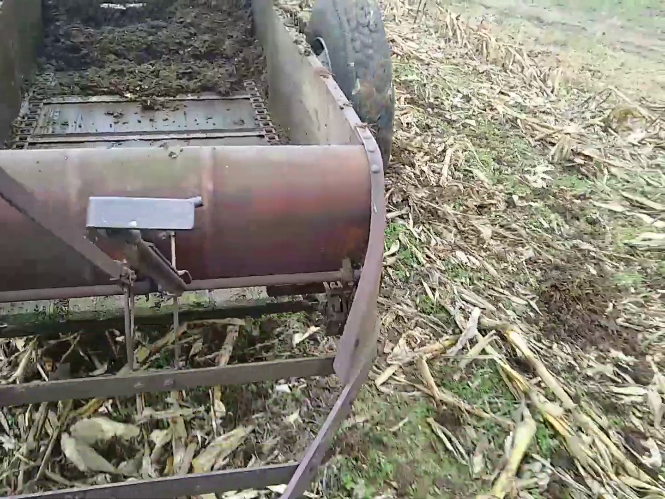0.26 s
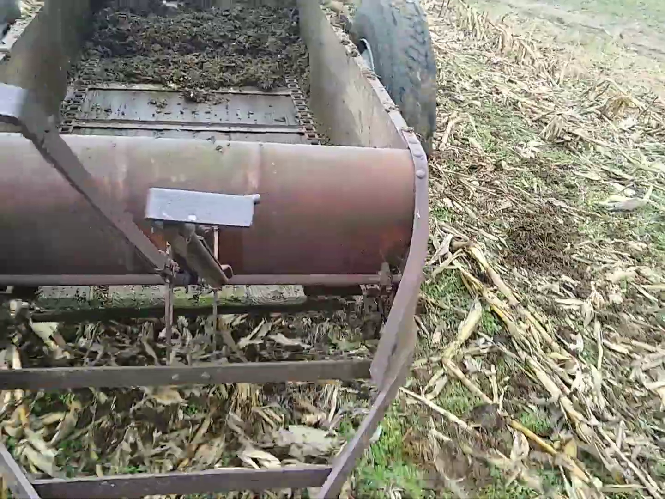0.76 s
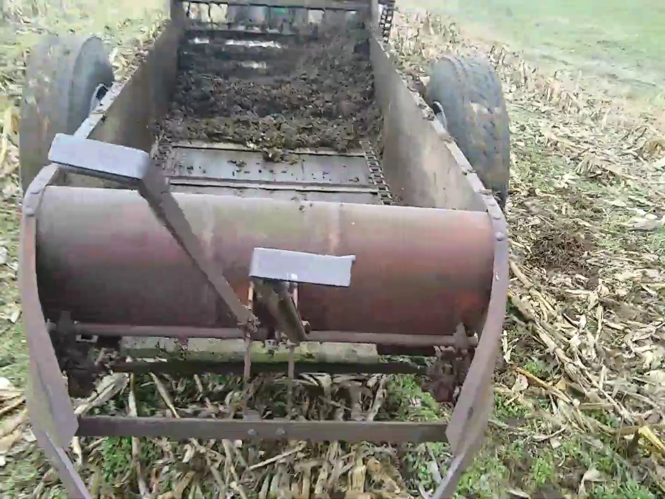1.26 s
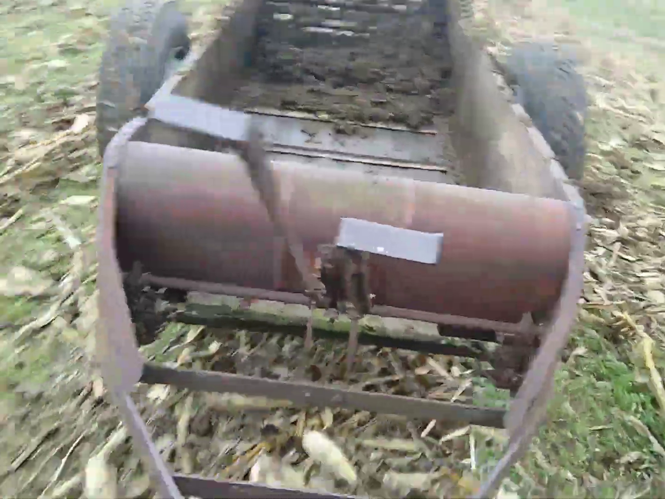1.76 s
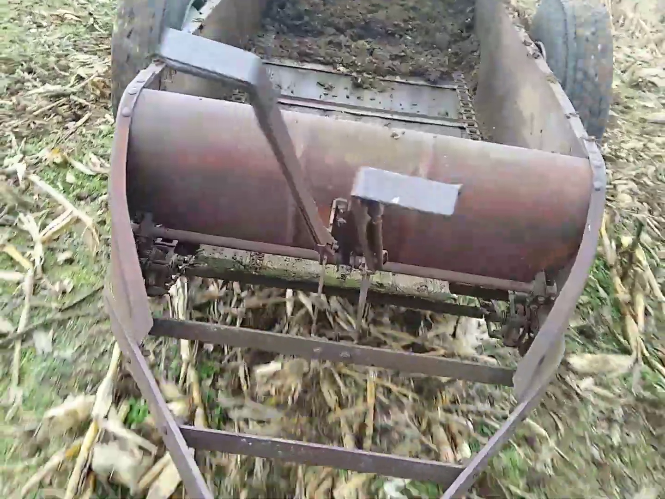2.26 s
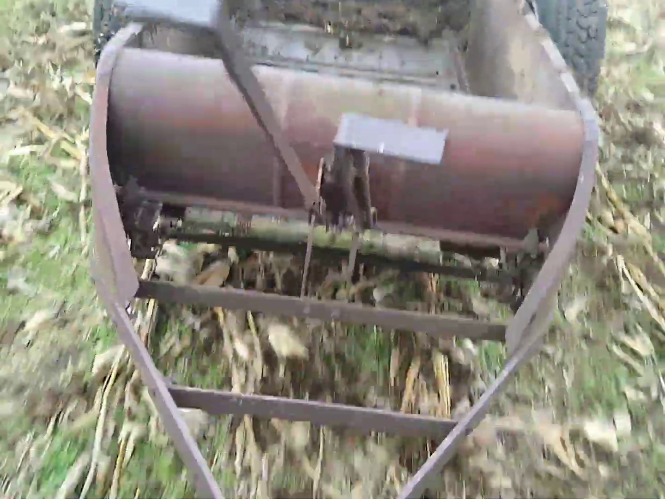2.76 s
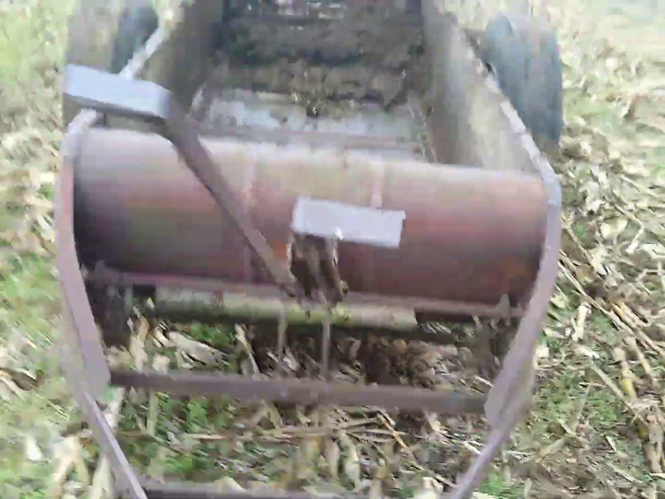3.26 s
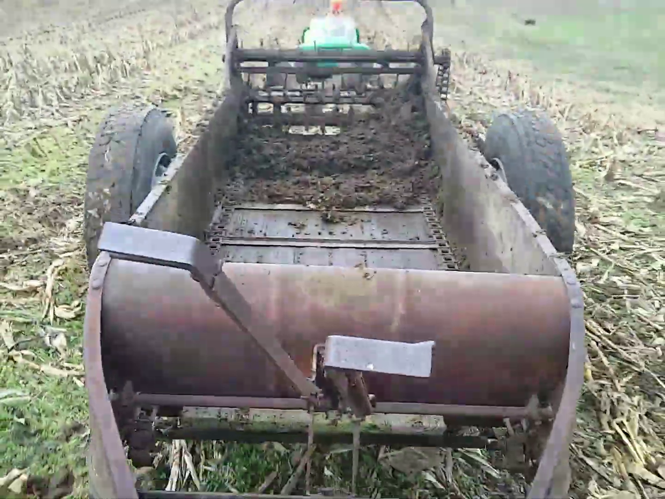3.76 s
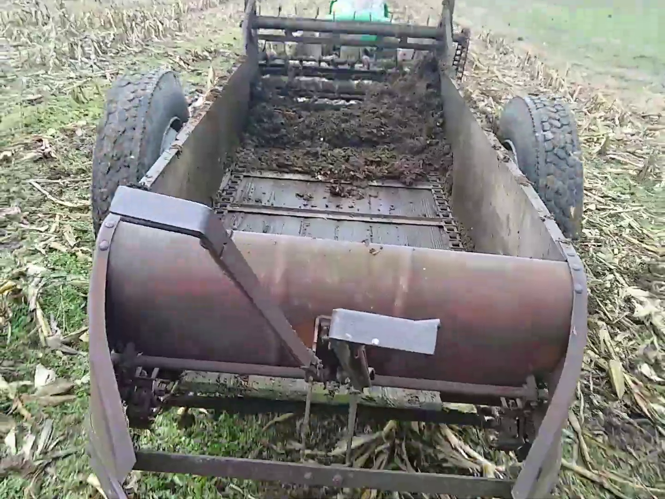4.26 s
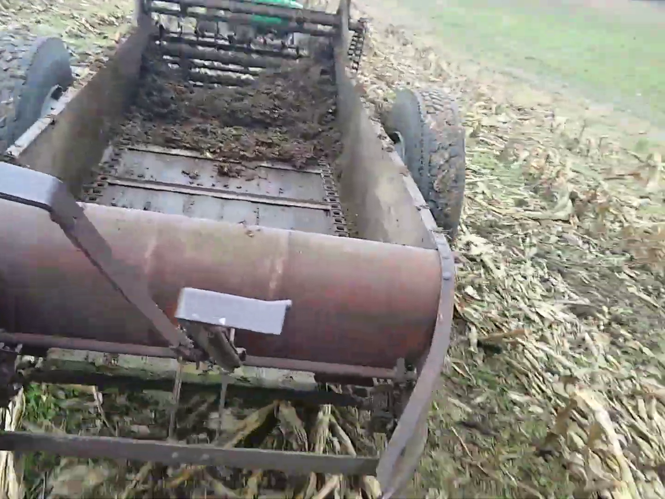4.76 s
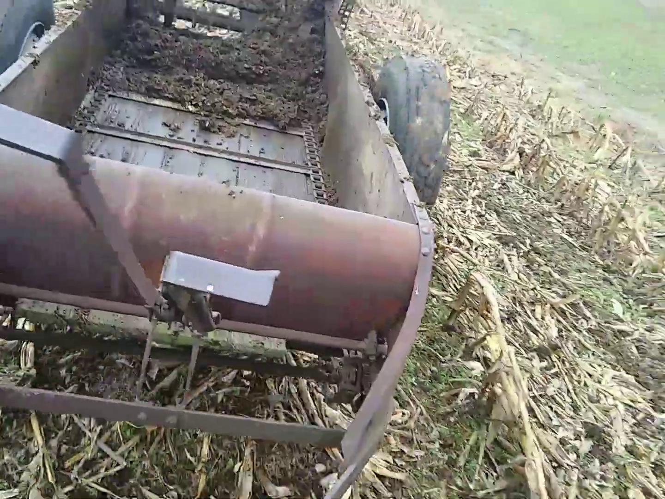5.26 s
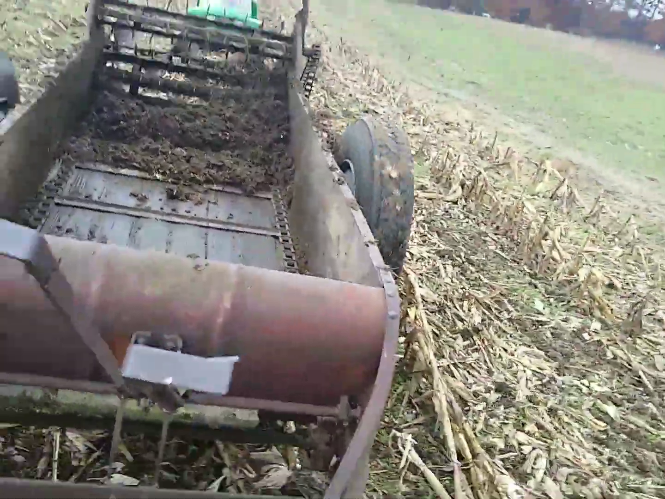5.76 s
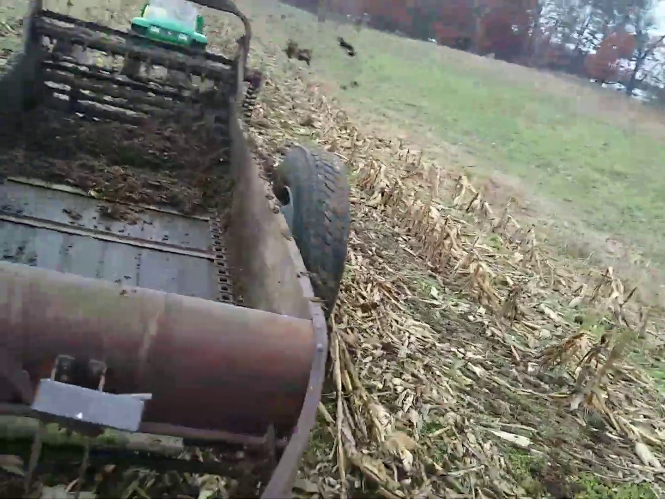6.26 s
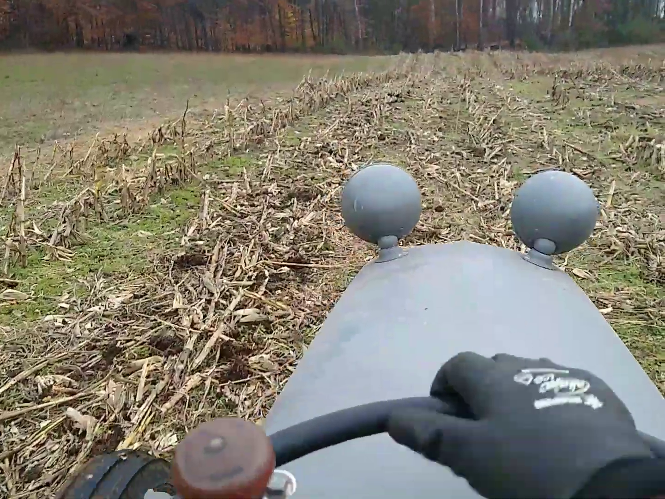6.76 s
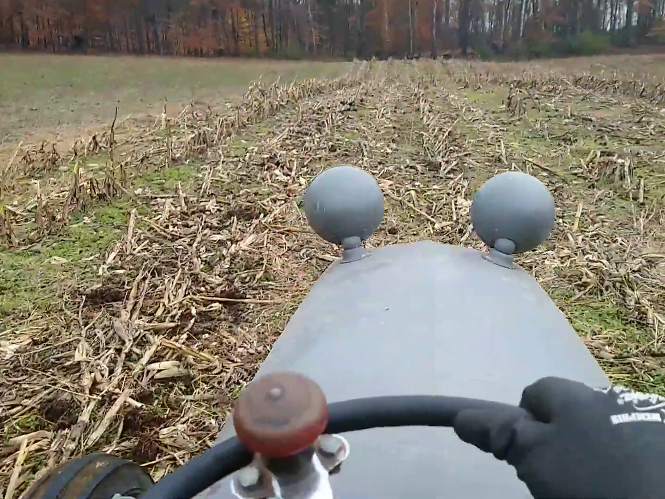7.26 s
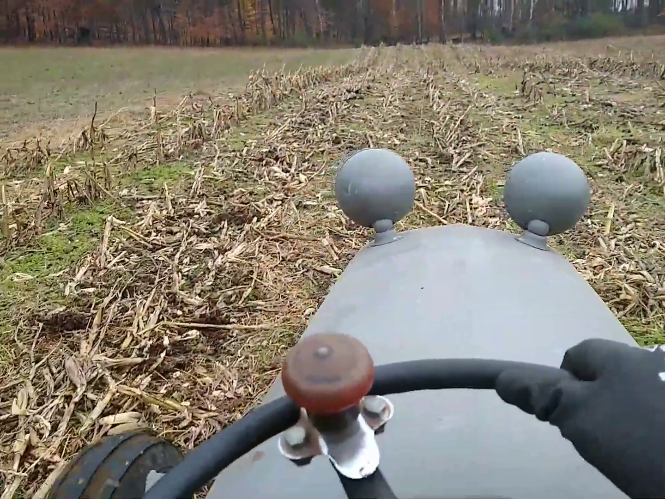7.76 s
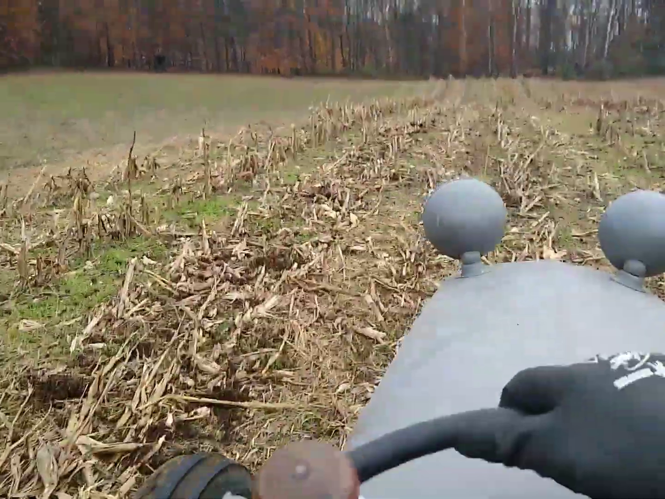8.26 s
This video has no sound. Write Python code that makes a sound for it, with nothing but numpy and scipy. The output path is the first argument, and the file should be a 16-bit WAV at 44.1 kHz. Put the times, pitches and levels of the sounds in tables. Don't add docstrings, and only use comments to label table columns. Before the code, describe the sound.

A small tractor engine growls steadily with pulsing bright hiss, metal chain ticks and wind thumps, cuts out for an instant, then returns much louder.

```python
import sys
import numpy as np
from scipy import signal
from scipy.fft import rfft, irfft, next_fast_len
from scipy.io import wavfile

SR = 44100
rng = np.random.default_rng(int(sys.argv[2]) if len(sys.argv) > 2 else 0)


def pcm_store(signal):
    levels = np.round(np.clip(np.atleast_2d(signal), -1, 1) * 32767)
    wavfile.write(sys.argv[1], SR, levels.astype(np.int16).T)


def gain_from_db(level_db):
    decades = np.asarray(level_db, float) / 20
    return 10 ** decades


N = 374850
FACING_BACK = np.arange(N) < 6.5 * SR

# (facing back [Hz, then dB], facing forward [Hz, then dB])
ENGINE_PACE = [(119, 112), (-35, -24)]
# (frequency [Hz], likeness [0 to 1])
LIKENESS = [(60, 0.88), (150, 0.98), (300, 0.86), (450, 0.53), (650, 0.39), (900, 0.035), (1500, 0.016),
            (3000, 0.049), (15000, .02)]


def by_side(back, forward):
    return np.where(FACING_BACK, back, forward)


def at_hz(points, hz):
    known_hz, values = np.array(points).T
    return np.interp(np.log(hz), np.log(known_hz), values)


def rms_one(x):
    return x / np.sqrt(np.mean(x ** 2) + 1e-20)


def drift(rate):
    r = np.exp(-80 * np.pi * rate / SR)
    slow = signal.lfilter([1], [1, -2 * r, r * r], rng.standard_normal(N // 40 + 2002))[2000:]
    return np.interp(np.arange(N) / 40, np.arange(len(slow)), rms_one(slow))


def resonance(x, hz, width):
    r = np.exp(-np.pi * width / SR)
    top = np.array([1, 0, -1]) * (1 - r * r) / 2
    return signal.lfilter(top, [1, -2 * r * np.cos(2 * np.pi * hz / SR), r * r], x)


def ports(lead_db):
    return gain_from_db(lead_db / 2 * np.array([[1], [-1]]))


def two_ports(common, own, alike):
    return np.sqrt(1 + alike) * common + np.sqrt(1 - alike) * own * [[1], [-1]]


def dips(events, fall, recover):
    t = np.arange(0, N + 40, 40) / SR
    out = 0
    for s, depth_db in events:
        shape = np.minimum(1 + (t - s) / fall, 1 - (t - s) / recover)
        out = out - depth_db * np.clip(shape, 0, 1)
    return np.interp(np.arange(N) / SR, t, out)


def tones(firing, level_db):
    # (multiple of the firing rate [1], level facing back [dB], facing forward [dB])
    exhaust = [(1, -10.5, -22.5), (2, 2, 2), (2.498, -15, -35), (3, -9, -3), (3.252, -19.5, -9.5),
               (4, -9.5, -9)]
    # (left excess back [dB], right lag back [rad],
    # left excess forward [dB], right lag forward [rad])
    tone_ports = [(5.2, .08, 2.4, 0), (2.7, .07, 2.7, .07), (3, 0, 3, 0), (4.7, .9, 3.6, -.2),
                  (3, 0, 3.6, -.2), (1, 0, 1, 0)]
    out = 0
    for (order, back_db, forward_db), (lead_db, lag, front_lead_db, front_lag) in zip(exhaust, tone_ports):
        waver_db = drift(0.8) * abs(order - 2) + 0.5 * drift(6.3)
        port_lag = by_side(lag, front_lag) * [[0], [1]]
        line = np.sin(2 * np.pi * (order * firing + rng.random()) - port_lag)
        gain = by_side(ports(lead_db), ports(front_lead_db))
        out = out + gain * gain_from_db(level_db + 11.5 + by_side(back_db, forward_db) + waver_db) * line
    return out


def knocks(firing, roar_db):
    cylinder_db = [-1.5, -26, -19.5, -12]
    # (frequency [Hz], width [Hz], level [dB])
    block = [(262, 180, -9), (452, 77, 7), (504, 35, 19.5), (523, 140, -4), (731, 180, 2.5),
             (980, 270, -18), (1445, 160, -23.5)]
    at = np.flatnonzero(np.diff(np.floor(firing)))
    pulses = np.full(N, 1e-18)
    pulses[at] = gain_from_db(np.resize(cylinder_db, len(at)) + 3.8 * rng.standard_normal(len(at)))
    rung = 0
    for k, (hz, width, db) in enumerate(block):
        rung = rung + (-1) ** k * gain_from_db(db) * resonance(pulses, hz, width)
    return ports(2.5) * gain_from_db(roar_db - 21.5) * rms_one(rung)


def pops(firing, roar_db):
    at = np.flatnonzero(np.diff(np.floor(firing / 2 + 0.58)))
    pulses = np.full(N, 1e-18)
    pulses[at] = gain_from_db(3 * rng.standard_normal(len(at)))
    shape = signal.butter(1, (150, 850), "band", fs=SR, output="sos")
    puff = signal.sosfilt(np.vstack([shape, shape]), pulses)
    usual_peak = np.median(puff[at + 8])
    return ports(2.0) * gain_from_db(roar_db + by_side(7.5, 2)) * puff / usual_peak


def gear_lines(firing, roar_db, whine_db):
    # (multiple of the firing rate [1], level re roar back [dB], forward [dB],
    # share of the whine control [1], right lag [rad])
    lines = [(4.5, -14, -32, 0, .3), (5, -24, -20, 0, 1.6), (6.25, -19, -32, 0, 1.6), (7, -17, -19, 0, .6),
             (7.25, -16, -32, 0, 0), (7.75, -12.5, -32, 0, 0), (8.25, -32, -22, 0, 0),
             (9.5, -9, -32, 1.4, 0), (10, -32, -24, 0, 0), (11, -12, -32, 1.4, 0), (14, -32, -28, 0, 0)]
    whine_db = np.minimum(whine_db, by_side(3, -6))
    out = 0
    for order, back_db, forward_db, share, lag in lines:
        phase = 2 * np.pi * order * firing + 0.45 * drift(2.5)
        level_db = by_side(back_db, forward_db) + share * whine_db + 1.8 * drift(2.5)
        out = out + gain_from_db(level_db) * np.sin(phase - lag * np.array([[0], [1]]))
    return by_side(ports(4), ports(1.5)) * gain_from_db(roar_db + 7) * out


def swing(level_db):
    return level_db - by_side(level_db[:N // 2].mean(), level_db[-N // 5:].mean())


def roar(firing, roar_db, clatter_db, rattle_db):
    # (frequency [Hz], level per Hz [dB])
    rear = [(40, -58.5), (62, -50.5), (90, -48), (250, -45.5), (450, -49.5), (700, -54.5), (1050, -60),
            (1500, -63), (2200, -67.5), (3500, -69), (6000, -76.5), (8500, -89.5), (12500, -53),
            (15000, -77.2)]
    # (frequency [Hz], level per Hz [dB])
    front = [(40, -56), (62, -39), (90, -43.5), (250, -34.5), (450, -47.5), (700, -44.5), (1050, -50),
             (1500, -56.5), (2200, -63), (3500, -65), (6000, -75), (8500, -88.5), (12500, -46),
             (15000, -79.9)]
    # (frequency [Hz], excess [dB])
    left_lead = [(60, 3), (250, 1.5), (450, 2), (900, .8), (2500, 1.2), (4000, .3), (6000, 1.3), (9000, .3),
                 (15000, -.3)]
    # (frequency [Hz], excess [dB])
    left_lead_front = [(60, 3), (250, 1.5), (450, .3), (900, 1.8), (2500, 3), (6000, 2.8), (15000, 1.5)]
    out, together = 0, drift(18)
    band_edges = 40 * 2 ** np.arange(0, 8.1, 0.5)
    white = rng.standard_normal((2, 2, N))
    throb = np.cos(2 * np.pi * firing) + 1.4 * np.cos(np.pi * firing + 1.3)
    throb = throb + 0.2 * np.cos(4 * np.pi * firing + 0.52)
    clatter_db, rattle_db = swing(clatter_db), swing(rattle_db)
    for k, (low, high) in enumerate(zip(band_edges, band_edges[1:])):
        band = signal.butter(2, [low, high], "band", fs=SR, output="sos")
        common, own = signal.sosfilt(band, white[k % 2])
        hz = np.sqrt(low * high)
        alike = np.clip(at_hz(LIKENESS, hz), 0, 1)
        near = min(alike + 0.3 * (hz > 1800), 1)
        tilt_db = at_hz([(1500, 0), (3200, 1), (6500, 0)], hz) * clatter_db
        tilt_db = tilt_db + at_hz([(1500, 0), (3200, 0), (6500, 1)], hz) * rattle_db
        colour_db = by_side(at_hz(rear, hz) + 51, at_hz(front, hz) + 41)
        flicker_db = 0.4 * together + (0.89 + hz / 5500) * drift(26.0)
        gain = gain_from_db(colour_db + tilt_db + flicker_db + 0.57 * throb)
        sides = by_side(ports(at_hz(left_lead, hz)), ports(at_hz(left_lead_front, hz)))
        noise = by_side(two_ports(common, own, alike), two_ports(common, own, near))
        out = out + sides * gain * noise
    return gain_from_db(roar_db + 13.5) * (out + panels())


def panels():
    # (frequency [Hz], width [Hz], level back [dB], level forward [dB])
    sheets = [(258.7, 43, 0, -4.5), (436, 120, -9, -5.5), (957, 93, -16.5, -7), (1016, 75, -29, -8.5),
              (1473, 90, -18.5, -13.5), (2185, 470, -12.5, -18.5), (2655, 78, -13, -17.5),
              (2881, 188, -17, -20)]
    white = rng.standard_normal((2, N))
    out = 0
    for hz, width, back_db, forward_db in sheets:
        alike = np.clip(at_hz(LIKENESS, hz), 0, 1)
        width = max(width, hz / 15)
        common, own = resonance(resonance(white, hz, width), hz, width)
        level_db = by_side(back_db, forward_db) + 5.5 + 1.98 * drift(6.7)
        out = out + gain_from_db(level_db) * two_ports(common, own, alike)
    return out


def valve_hiss(firing, pulsing_db, level_db, left_db):
    # (frequency [Hz], width [Hz], level [dB])
    whistles = [(12300, 500, -5), (13300, 250, 2), (13680, 200, 5), (14020, 200, 5), (14680, 260, 3)]
    white = rng.standard_normal((2, N))
    band = signal.butter(2, [9800, 17000], "band", fs=SR, output="sos")
    air = signal.sosfilt(band, white)
    for hz, width, db in whistles:
        air = air + gain_from_db(db + by_side(1, -15) + 1.9 * drift(0.88)) * resonance(white, hz, width)
    turn = 2 * np.pi * firing + 0.3 * drift(12)
    puffs = np.cos(turn) + 0.85 * np.cos(2 * turn + 0.6) + 0.4 * np.cos(3 * turn + 1.1)
    puffing_db = level_db + 5.5 + pulsing_db * puffs + 1.95 * drift(39)
    return gain_from_db(puffing_db) * ports(left_db) * rms_one(air)


def chain():
    # (time [s], peak level [dB])
    loud_ticks = [(1.4197, -44), (1.8143, -38), (1.9909, -36), (2.1415, -36), (2.2443, -34), (2.2862, -43),
                  (2.3436, -28.5), (2.5451, -32), (2.6449, -50), (2.7442, -34), (2.812, -32), (3.014, -33),
                  (3.2326, -35), (3.6301, -34), (3.8871, -37), (3.9035, -31), (4.0053, -35), (4.0552, -35),
                  (4.1555, -41.5), (4.1884, -38), (4.2722, -50), (4.4094, -41), (4.4403, -30),
                  (4.5251, -39), (4.7466, -32), (5.0814, -39), (5.7548, -33), (6.0082, -39), (6.103, -42),
                  (6.1434, -38)]
    out, t = np.zeros((2, N)), np.arange(SR // 20) / SR
    ticks = list(loud_ticks) + faint_ticks()
    chances = rng.standard_normal((len(ticks), 3))
    for (s, db), (pan_db, grit, detune) in zip(ticks, chances):
        at = round(s * SR)
        link_hz = 5160 + 120 * detune
        ring = np.sin(2 * np.pi * link_hz * t) * gain_from_db(-60 * t / 0.026)
        click = rng.standard_normal((2, len(t))) * gain_from_db(-60 * t / 0.012 - 9 + 3 * grit)
        snap = ring + np.diff(click, prepend=0)
        out[:, at:at + len(t)] += gain_from_db(db - 1.2) * ports(3 * pan_db) * snap
    return out


def faint_ticks():
    turns_per_s = ENGINE_PACE[0][0] / 4
    s = (np.arange(190) + 0.8) / turns_per_s
    luck, spread = rng.random((190, 2)).T
    return [(at, -44 - 6 * r) for at, p, r in zip(s, luck, spread) if p < 0.3]


def wind():
    # (time [s], level [dB])
    bumps = [
        (.27, -28),
        (1.19, -21),
        (1.31, -34),
        (1.39, -22),
        (1.93, -21),
        (2.9, -23),
        (3.27, -22),
        (4.9, -20),
    ]
    t = np.arange(N) / SR
    swell = sum(gain_from_db(db) * np.clip(1 - abs(t - s) / 0.065, 0, 1) for s, db in bumps)
    band = signal.butter(2, [75, 170], "band", fs=SR, output="sos")
    lumps = signal.sosfilt(band, rng.standard_normal(N))
    air = [[1, 0.33], [0.46, -0.3]] @ rng.standard_normal((2, N))
    breeze = signal.lfilter([1], [1, -0.995], air)
    return [[1], [0]] * swell * rms_one(lumps) + gain_from_db(by_side(-38.5, -40)) * rms_one(breeze)


def gain_db():
    # (time [s], depth [dB])
    ducks = [(1.37, 2), (1.48, 6), (1.95, 2.5), (2.57, 3), (3.53, 5.5), (3.65, 6.5), (4.38, 3), (4.76, 2),
             (4.98, 3), (5.33, 4.5), (5.85, 2.5), (7.6, 1), (8.12, 0)]
    t = np.arange(N) / SR
    late = t - 6.633
    overshoot_db = 3.5 * np.exp(-np.maximum(late, 0) / 0.0084)
    fade_db = overshoot_db + 1150 * np.minimum(late, 0)
    stop_db = np.where(t < 6.438, 0, np.maximum(fade_db, -95))
    return dips(ducks, fall=0.038, recover=0.11) + stop_db


def scene():
    # (time [s], loudness at the seat [dB], sight of the valve cover [dB], left excess [dB])
    driver = [(0, -30, 3.5, -7), (.35, -30, 1.5, -1.5), (.7, -29, 3, -2.5), (1.25, -30, 2, -2),
              (1.75, -30.5, 1, 1.5), (2.2, -29.5, -3, 2.5), (2.45, -30, -0.5, 1), (2.7, -29.5, 1, 1),
              (3.2, -30.5, -1.5, 2), (3.5, -28.5, -1.5, 3.5), (4.2, -29.5, -0.5, 2), (5.2, -29.5, -2, 2.5),
              (5.9, -29.5, -1, 1.2), (6.2, -30, 0.5, 0.5), (6.44, -28, 0.5, -1.5), (6.64, -23, -1.5, 0),
              (6.8, -17.5, -2, 1.5), (8.5, -17, -0.5, 1)]
    # (time [s], depth [dB])
    shades = [(.24, 2), (.47, 1), (1.02, 4), (1.62, 1), (1.96, 6), (2.5, 7), (2.96, 12), (3.06, 6),
              (3.42, 10), (3.87, 10), (4.28, 5), (4.36, 5), (4.51, 7), (4.82, 2), (5.03, 0.5), (5.35, 3),
              (5.55, 9.5), (5.89, 1), (7.56, 1), (8.16, 1)]
    firing = np.cumsum(by_side(*ENGINE_PACE[0]) / 2) / SR
    s, *columns = np.transpose(driver)
    roar_db, sight_db, left_db = [np.interp(np.arange(N) / SR, s, c) for c in columns]
    shade_db = dips(shades, fall=0.06, recover=0.055)
    bright_db = sight_db + shade_db
    settling_db = by_side(0, roar_db - roar_db[-1])

    whine_db = by_side(-7.5, 0) + 1.4 * sight_db
    engine = knocks(firing, roar_db) + pops(firing, roar_db) + gear_lines(firing, roar_db, whine_db)
    engine = engine + roar(firing, roar_db, clatter_db=0.5 * bright_db, rattle_db=0.45 * bright_db)
    engine = engine * ports(left_db)
    exhaust = tones(firing, by_side(*ENGINE_PACE[1]) + settling_db)

    hiss_left_db = 1.5 + 1.2 * left_db - 0.3 * shade_db
    hiss_db = by_side(-45.5, -41) + bright_db + settling_db
    hiss = valve_hiss(firing, by_side(1.5, 0.5), hiss_db, hiss_left_db)
    return exhaust + engine + hiss + chain() + wind()


def low_pass(x):
    return signal.sosfilt(signal.butter(12, 16660, fs=SR, output="sos"), x)


def record(dry):
    size = next_fast_len(N + 256)
    hz = np.arange(size // 2 + 1) * SR / size
    share = 0.16 + 0.65 / (1 + (hz / 6800) ** 3)
    lag_s = 19.75 / 44100
    late = share * np.exp(-2j * np.pi * hz * lag_s)
    spectra = rfft(dry, size)
    wide = irfft(spectra - late * spectra[::-1], size)[:, :N]
    wide = signal.sosfilt(signal.butter(1, 30, "high", fs=SR, output="sos"), wide)
    wide = 1.3 * np.tanh(wide / 1.3)
    wide = signal.sosfilt(signal.ellip(12, 0.5, 70, 15530, fs=SR, output="sos"), wide)
    return low_pass(wide * gain_from_db(gain_db()))


dry = scene()
out = record(dry)
pcm_store(out)
```